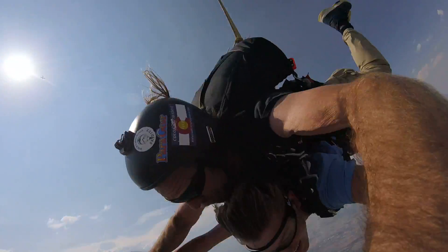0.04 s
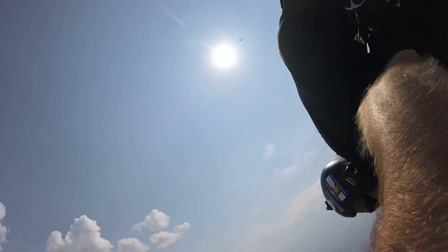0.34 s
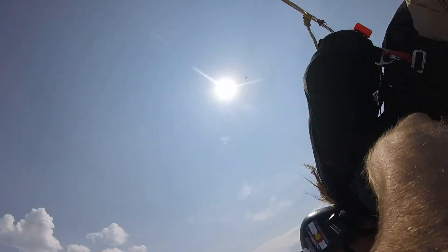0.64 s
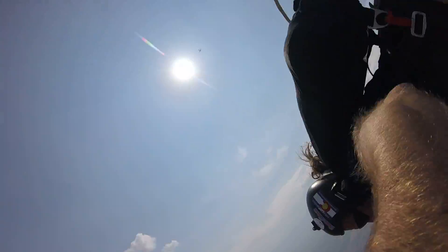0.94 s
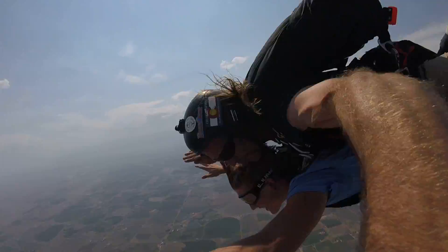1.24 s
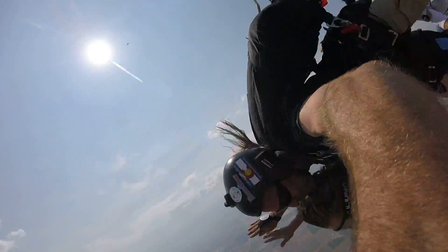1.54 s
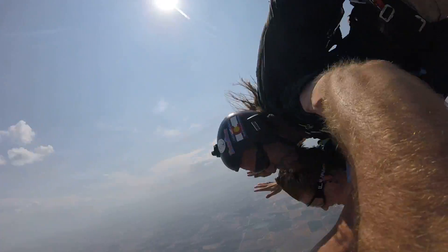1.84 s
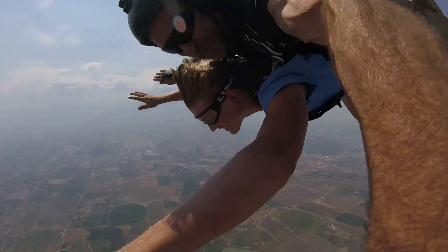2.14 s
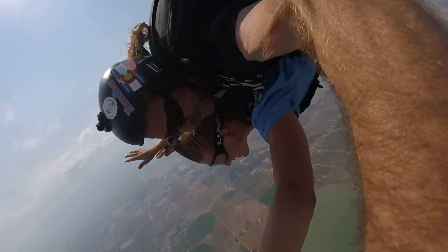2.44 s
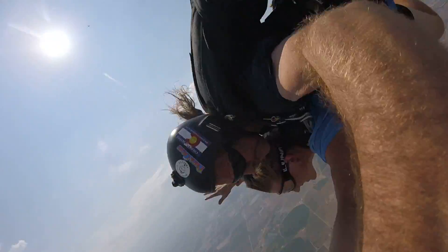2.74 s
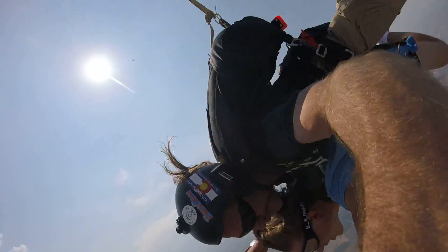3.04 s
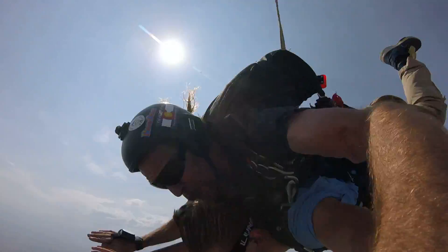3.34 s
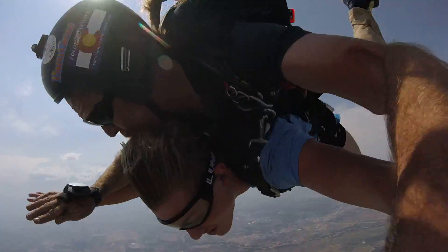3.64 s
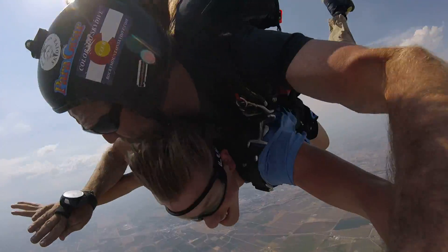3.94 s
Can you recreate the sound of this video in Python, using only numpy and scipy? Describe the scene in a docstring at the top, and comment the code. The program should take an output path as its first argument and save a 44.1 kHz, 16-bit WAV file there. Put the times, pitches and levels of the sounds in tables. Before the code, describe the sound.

Rushing wind rumbles and crackles over a skydiver's microphone, surging and easing unevenly.

```python
"""In open air, in free fall: air rushes over the microphone port of a hand-held camera that keeps turning.
In the lee, large eddies of the wake rumble, buffet and thump, and small ones crackle and pop.
Facing the stream, the port hisses with fine-grained turbulence; at the angles in between,
the flow separates from the housing with a bright rasp. The port resonates near 5.5 kHz."""
import sys
import numpy as np
from scipy import signal
from scipy.fft import rfft, irfft
from scipy.io import wavfile
from scipy.ndimage import uniform_filter1d

SR = 44100
rng = np.random.default_rng(int(sys.argv[2]) if len(sys.argv) > 2 else 0)


def int16_out(signal):
    """Quantize to a 16-bit WAV file."""
    q = np.round(np.clip(np.atleast_2d(signal).T, -1, 1) * 32767)
    wavfile.write(sys.argv[1], SR, q.astype(np.int16))


N = 176400

# strength of the eddies beating on the housing: t/s, relative level/dB
BUFFET_LEVEL = [(0, -21), (.04, -15.5), (.1, -27.5), (.18, -34), (.21, -16.5), (.25, -33), (.29, -15.5),
                (.33, -42.5), (.5, -37.5), (.57, -31.5), (.68, -27.5), (1.03, -34.5), (1.15, -37),
                (1.2, -20.5), (1.28, -36), (1.53, -24.5), (1.61, -29), (1.73, -20.5), (1.76, -37),
                (1.85, -35), (1.9, -18), (1.96, -32), (2.01, -26), (2.08, -15.5), (2.16, -16.5),
                (2.26, -20.5), (2.36, -15), (2.47, -27.5), (2.63, -33), (2.672, -26.5), (2.69, -17),
                (2.98, -23), (3.04, -34.5), (3.41, -21), (3.49, -31), (3.86, -31.5), (4, -25)]
# spectrum of a small eddy bursting: f/Hz, relative level/dB
BURST_SPECTRUM = [(150, -9.5), (700, 11), (1800, 4.5), (3200, -4), (5500, -13.5), (11000, -36)]


def from_db(db):
    """Amplitude ratio of a level: a factor of ten per 20 dB."""
    return 10 ** (np.asarray(db) / 20)


def unit_rms(x):
    """Normalisation to a mean square of one."""
    return x / np.sqrt(np.mean(x ** 2) + 1e-20)


def in_time(curve):
    """Linear interpolation of a curve at every sample."""
    return np.interp(np.arange(N) / SR, *np.transpose(curve))


def spells(curves, edge_s=0.0085):
    """Amplitude envelope that follows each level curve, with Gaussian fades beyond its ends."""
    t = np.arange(N) / SR
    gain = 0
    for curve in curves:
        outside_s = t - np.clip(t, curve[0][0], curve[-1][0])
        gain = gain + from_db(in_time(curve)) * np.exp(-(outside_s / edge_s) ** 2)
    return gain


def coloured(x, spectrum):
    """Zero-phase filtering by rows of f/Hz, level/dB, interpolated in log frequency."""
    hz, db = np.transpose(spectrum)
    bin_hz = np.maximum(np.arange(N // 2 + 1) * SR / N, 1)
    return irfft(rfft(x) * from_db(np.interp(np.log(bin_hz), np.log(hz), db)), N)


def drift(rate_hz):
    """Low-pass random fluctuation of unit rms, its extremes rounded."""
    slow = signal.sosfilt(signal.butter(2, rate_hz, fs=SR, output="sos"), rng.standard_normal(N + SR))
    return unit_rms(np.tanh(unit_rms(slow[SR:]) / 2))


def turbulence(spectrum, flutter_db, flutter_hz, window):
    """Intermittency: noise of unit rms in irregular puffs, its power levelled over `window` samples."""
    puffs = coloured(rng.standard_normal(N) * from_db(flutter_db * drift(flutter_hz)), spectrum)
    power = uniform_filter1d(uniform_filter1d(puffs ** 2, size=window), size=window)
    return unit_rms(puffs / np.sqrt(power + 1e-20))


def rumble():
    """Wake turbulence: the largest eddies give the slowest pressure swings."""
    # strength of the swings: t/s, relative level/dB
    level = [(0, -25.5), (.28, -26.5), (.38, -32.5), (.72, -31.5), (.85, -27), (1.0, -29), (1.38, -27.5),
             (1.55, -23.5), (1.8, -34), (2.05, -25), (2.15, -21.5), (2.3, -27), (2.72, -24), (2.85, -24.5),
             (3.02, -24.5), (3.14, -21), (3.26, -33.5), (3.41, -23.5), (3.52, -33), (3.9, -24.5), (4, -28)]
    # their spectrum: f/Hz, relative level/dB
    spectrum = [(15, -5), (30, -9.5), (60, -3), (120, -1), (200, -11.5), (400, -17), (1000, -49.5),
                (3000, -49)]
    return from_db(in_time(level) + 1) * turbulence(spectrum, flutter_db=4.5, flutter_hz=25, window=2400)


def buffet():
    """Amplitude modulation: small eddies ride on the swings of mid-sized ones and gain with the flow."""
    # eddy pressure on the housing: f/Hz, relative level/dB
    spectrum = [(40, -16.5), (100, -10), (170, 1.5), (400, -5), (700, -11), (1100, -18.5), (2000, -28),
                (3200, -35.5), (5500, -48.5), (11000, -50)]
    split_hz, swell_db, growth_db_per_db = 900, 1.5, 0.11
    db = in_time(BUFFET_LEVEL)
    eddies = turbulence(spectrum, flutter_db=2.0, flutter_hz=90, window=1200)
    mid_sized = signal.sosfiltfilt(signal.butter(2, split_hz, fs=SR, output="sos"), eddies)
    small_gain = from_db(swell_db * np.clip(mid_sized, -2, 2) + growth_db_per_db * (db - db.mean()))
    return from_db(db + 0.5) * (mid_sized + small_gain * (eddies - mid_sized))


def crackle():
    """Shot noise: tiny pressure snaps arrive at random, stronger when the buffeting is."""
    snaps_per_s, spread_db, growth_db_per_db = 360, 4, 0.62
    sizes = from_db(spread_db * np.minimum(rng.exponential(1, N), 4.5)) * rng.choice([-1, 1], N)
    snaps = coloured(sizes * (rng.random(N) < snaps_per_s / SR), BURST_SPECTRUM)
    db = in_time(BUFFET_LEVEL)
    return unit_rms(snaps) * from_db(db.mean() - 13.5 + growth_db_per_db * (db - db.mean()))


def rasp():
    """Flow separation: the stream tears off an edge of the housing in ragged spells."""
    # one curve per spell of separation: t/s, relative level/dB
    tears = [
        [(0, -19.5), (.05, -24), (.075, -18), (.155, -18.5), (.183, -38.5), (.2, -22.5), (.224, -17),
         (.244, -36), (.288, -22.5), (.305, -48)],
        [(1.172, -35), (1.186, -18), (1.196, -14.5), (1.208, -15), (1.228, -42)],
        [(1.625, -45), (1.648, -20), (1.675, -24), (1.696, -31.5), (1.722, -22), (1.755, -47)],
        [(1.86, -42), (1.9, -12), (1.918, -39)],
        [(2.68, -27.5), (2.715, -39.5), (2.77, -40), (2.8, -29), (2.85, -38), (2.93, -21.5), (3.02, -24),
         (3.06, -24.5), (3.2, -25), (3.345, -19), (3.385, -38)],
    ]
    # spectrum of the separated flow: f/Hz, relative level/dB
    spectrum = [(80, -24), (300, -2.5), (650, 2), (1200, -2), (2000, -6.5), (3200, -13.5), (5500, -21),
                (11000, -33.5)]
    return from_db(2) * spells(tears) * turbulence(spectrum, flutter_db=2.5, flutter_hz=173, window=800)


def hiss():
    """Fine-scale turbulence: fast flow straight across the port hisses, fuller as it grows."""
    # one curve per turn of the port into the stream: t/s, relative level/dB
    facing = [
        [(0, -36), (.15, -30.5), (.18, -50), (.215, -32), (.25, -41), (.28, -37), (.365, -48), (.44, -37),
         (.7, -34.5), (.93, -28.5), (1.08, -32), (1.1, -23), (1.205, -30), (1.225, -51)],
        [(1.63, -51), (1.648, -32), (1.68, -39), (1.696, -45), (1.72, -31.5), (1.895, -29.5), (1.92, -64)],
        [(2.89, -55), (2.925, -36), (3.01, -28.5), (3.35, -29), (3.385, -52)],
    ]
    # spectrum of the fine eddies: f/Hz, relative level/dB
    spectrum = [(300, -8.5), (1000, -3), (2400, 0.5), (3400, 1.5), (6000, 0), (11000, 0)]
    body_hz, growth_db_per_db, neutral_db = 4520, 0.44, -31
    flow = spells(facing)
    eddies = turbulence(spectrum, flutter_db=1.5, flutter_hz=260, window=1200)
    body = signal.sosfiltfilt(signal.butter(3, body_hz, fs=SR, output="sos"), eddies)
    body_gain = (flow / from_db(neutral_db)) ** growth_db_per_db
    return from_db(3) * flow * (eddies - body + body_gain * body)


def sputter():
    """Wind shadow: a faint sputter remains in the lee, growing as flow edges round the housing."""
    # flow reaching the sheltered port: t/s, relative level/dB
    level = [(1.3, -12), (2.6, -5), (3.45, 8), (4, 5)]
    # its spectrum: f/Hz, relative level/dB
    spectrum = [(500, -7.5), (1500, 7), (2600, 9), (4500, 2), (11000, -2)]
    eddies = turbulence(spectrum, flutter_db=5.5, flutter_hz=140, window=3000)
    return from_db(in_time(level) - 57.5) * eddies


def pops():
    """Pressure transients: an eddy bursting on the port gives a spike inside a brief puff of noise."""
    # single eddies: t/s, relative level/dB, spectral tilt/(dB per octave)
    bursts = [(1.287, -27, 1.5), (1.327, -31.5, -2.5), (1.369, -14, -2.5), (1.518, -22, -2),
              (1.548, -24.5, 5), (1.566, -19, 2), (1.645, -15.5, -9), (2.034, -13, -2), (2.465, -23.5, 0.5),
              (2.684, -11.5, -5.5), (2.699, -19, -1.5), (2.789, -15.5, -1), (2.814, -20.5, 7),
              (3.433, -23.5, 1.5), (3.656, -23.5, 1), (3.904, -29, 1), (3.966, -22, 1.5)]
    attack_s, decay_s, spike_s = 0.00051, 0.0022, 0.00047
    pressure = 0
    for peak_s, db, tilt in bursts:
        t = np.arange(N) / SR - peak_s
        spectrum = [(hz, level + tilt * np.log2(hz)) for hz, level in BURST_SPECTRUM]
        puff = unit_rms(coloured(rng.standard_normal(N), spectrum))
        envelope = np.exp(-np.minimum(np.maximum(-t / attack_s, t / decay_s), 20))
        spike = 0.8 / (1 + (t / spike_s) ** 2)
        pressure = pressure + from_db(db + 1) * (envelope * puff + spike)
    return pressure


def thumps(width_s=0.0021):
    """Vortex convection: suction, then overpressure, as each large vortex passes the port."""
    # passing vortices: t/s, peak level/dB
    vortices = [(1.602, -7), (2.828, -14.5), (2.876, -19), (3.379, -10)]
    pressure = 0
    for centre_s, db in vortices:
        passage = (np.arange(N) / SR - centre_s) / width_s
        pressure = pressure + from_db(db) * passage * np.exp((1 - passage ** 2) / 2)
    return pressure


def scene():
    """Superposition and resonance: the pressures add and are filtered by the port, in one channel."""
    # frequency response of the port: f/Hz, gain/dB
    port = [(1000, 0.5), (3000, -0.5), (4300, -5), (5000, 2.5), (5500, 7), (6200, 3), (7000, -1.5),
            (8000, -7), (10000, -20.5), (12500, -38.5)]
    pressure = rumble() + buffet() + crackle() + rasp() + hiss() + sputter() + pops() + thumps()
    return coloured(pressure, port)[None]


def record(dry):
    """Saturation and band limiting: peaks are rounded, then the highest treble is cut."""
    stopband_hz = 13800
    return signal.sosfilt(signal.cheby2(12, 70, stopband_hz, fs=SR, output="sos"), np.tanh(dry))


dry = scene()
out = record(dry)
int16_out(out)
```